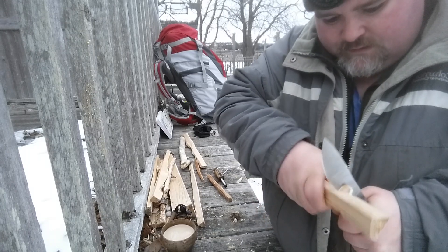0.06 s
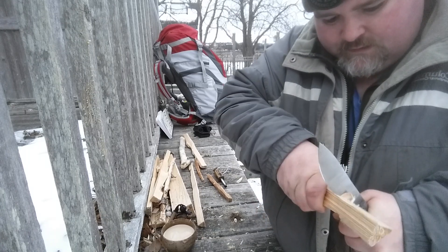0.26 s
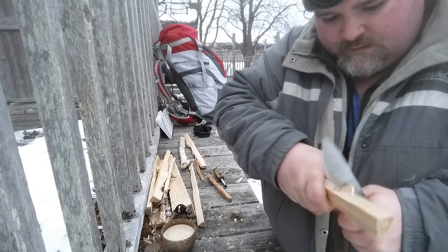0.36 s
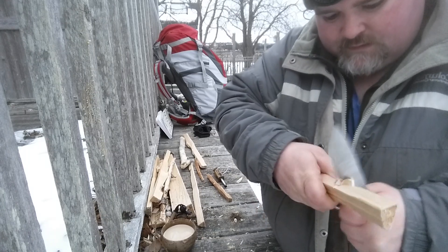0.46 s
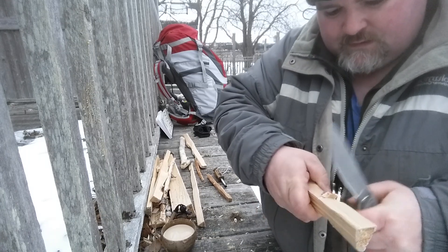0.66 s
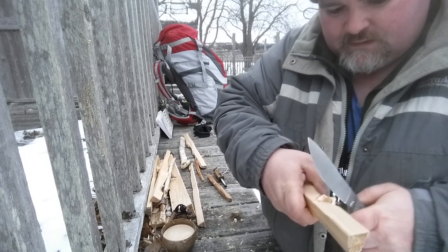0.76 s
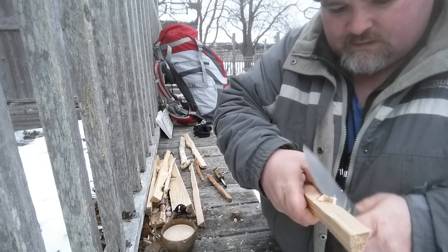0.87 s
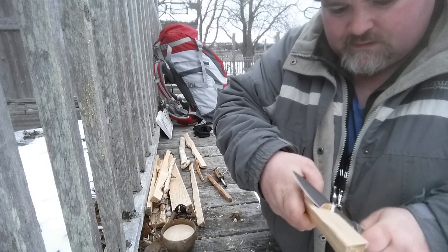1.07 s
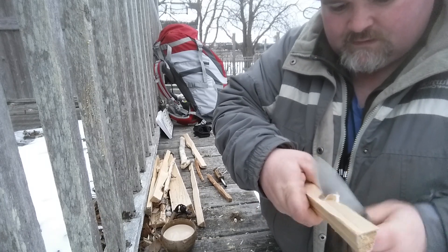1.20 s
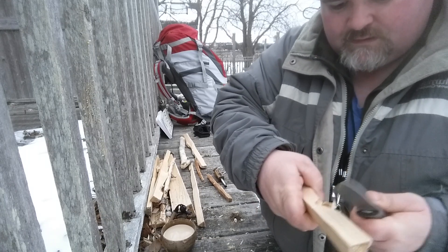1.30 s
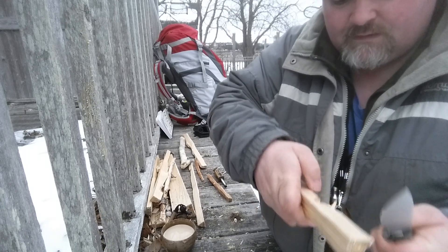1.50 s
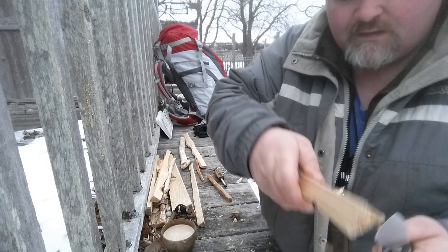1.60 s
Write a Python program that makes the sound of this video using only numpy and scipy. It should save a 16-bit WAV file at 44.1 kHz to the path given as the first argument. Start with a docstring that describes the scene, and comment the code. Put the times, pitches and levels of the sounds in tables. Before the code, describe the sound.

Close, dry whittling in an open yard: quick woody clicks, a hard crack as a chip breaks, then lighter knocks and hissy shaving, with jacket rustle, low distant rumble and a faint steady hum beneath.

```python
"""Outdoors in a yard, a knife cleans a notch in a hand-held stick, close to a small stereo microphone.
The edge bites in short noise bursts and damped stick modes; a chip snaps off and the blade rings.
Then the blade taps, squeaks in narrow bands of noise and shaves with grainy hiss; sleeves rustle.
Filtered noise makes the distant rumble, wash and fading hiss, and two sines a faint hum.
The microphone ports lift the high treble, differently on each side."""
import sys
import numpy as np
from scipy import signal
from scipy.fft import rfft, irfft, next_fast_len
from scipy.io import wavfile
from scipy.ndimage import uniform_filter1d

SR = 44100
rng = np.random.default_rng(int(sys.argv[2]) if len(sys.argv) > 2 else 0)


def generate_wav(sig):
    """Save sig (samples, or channels by samples) to the path in sys.argv[1] as 16-bit PCM at SR."""
    pcm = np.round(np.clip(np.atleast_2d(sig).T, -1, 1) * 32767).astype(np.int16)
    wavfile.write(sys.argv[1], SR, pcm)


N = 72765

# blade meets wood, levels ahead of the microphone:
# start_s, knock_db, knock_centre_hz, knock_width_octaves, crack_db, crack_rise_s
CONTACTS = [(0.1942, -46, 1830, 1.2, -53, 0.0011), (0.218, -53, 600, .8, -58, 0.0019),
            (0.226, -63, 700, 1, -54, 0.00054), (0.2306, -57, 1000, 0.85, -47.5, 0.00073),
            (0.2348, -36.5, 930, 0.35, -67, 0.00077), (0.313, -18, 1920, 2.9, -30, 0.0015),
            (0.6195, -74, 2000, 1, -66, 0.0027), (1.1640, -47, 1010, 1.45, -62, 0.00072),
            (1.4294, -36, 2460, 1.04, -58, .0006)]
YARD_T60_S = 0.23  # the scatter's decay; each knock is also cut off after this time


def undb(db):
    """Decibels to gain."""
    return 10 ** (np.asarray(db) / 20)


def unit(x):
    """Scale to rms 1."""
    return x / np.sqrt(np.mean(x ** 2))


def colour(x, points):
    """Causal minimum-phase filter through (Hz, dB) points, built by folding the cepstrum."""
    size = 2 * next_fast_len(N)
    hz, db = np.array(points, float).T
    bin_hz = np.arange(size // 2 + 1) * SR / size
    log_gain = np.interp(np.log(bin_hz + 1), np.log(hz), np.log(undb(db)))
    cepstrum = irfft(log_gain, size)
    cepstrum[1:size // 2] *= 2
    cepstrum[size // 2 + 1:] = 0
    response = np.exp(rfft(cepstrum))
    return irfft(rfft(x, size) * response, size)[..., :N]


def resonate(x, hz, width_hz):
    """One resonance, gain 1 at its centre."""
    return signal.lfilter(*signal.iirpeak(hz, hz / width_hz, fs=SR), x)


def ring(age, hz, t60):
    """A struck mode, a sine dying by 60 dB in t60 seconds."""
    return np.sin(2 * np.pi * hz * age) * np.exp(-np.log(1000) * age / t60)


def walk(rate):
    """Smooth random drift of rms 1, with about `rate` new values a second."""
    k = int(SR / rate)
    steps = np.repeat(rng.standard_normal(N // k + 2), k)
    smooth = uniform_filter1d(uniform_filter1d(steps, k), k)
    return unit(smooth[:N])


def swell(t, at, rise, fall, db):
    """A bell-shaped push with its own rise and fall."""
    return undb(db) * np.exp(-((t - at) / np.where(t < at, rise, fall)) ** 2)


def friction():
    """Dense tiny slips of uneven size over a smooth hiss, as heard at the two ports."""
    slips_per_s, spread_db, smooth_share = 5000, 3.5, 0.52
    sizes = undb(spread_db * rng.standard_normal(N))
    slips = (rng.random(N) < slips_per_s / SR) * sizes
    grains = unit(slips * rng.standard_normal((2, N)))
    smooth = rng.standard_normal((2, N))
    return np.sqrt(1 - smooth_share) * grains + np.sqrt(smooth_share) * smooth


def outdoors():
    """Distant rumble, alike on both sides in the bass, and a machine hum that wavers slightly."""
    # rumble spectrum: hz, density_db
    rumble_spectrum = [(12, -9.5), (30, 2), (55, -2.5), (90, -3), (160, -6), (300, -10.5), (420, -15.5),
                       (600, -25), (1150, -28.5), (1750, -39.5), (2250, -33), (2650, -41.5), (3100, -39.5),
                       (4500, -58), (9000, -58.5), (16000, -41)]
    rumble_db, alike_below_hz = -51, 606
    hum_hz, hum_db, octave_db, waver_share = 193.4, -54, -17.5, 0.0042
    mid, side = rng.standard_normal((2, N))
    side = signal.sosfilt(signal.butter(1, alike_below_hz, "high", fs=SR, output="sos"), side)
    rumble = unit(colour(mid + side * np.array([[1], [-1]]), rumble_spectrum))
    phase = 2 * np.pi * np.cumsum(hum_hz * (1 + waver_share * walk(8.2))) / SR
    hum = unit(np.sin(phase) + undb(octave_db) * np.sin(2 * phase))
    return undb(rumble_db) * rumble + undb(hum_db) * hum


def distance(t):
    """A far midrange wash of noise swells and ebbs; a hiss through two resonances fades."""
    # wash over time: start_s, level_db
    wash_levels = [(0, -61.5), (.3, -78), (.55, -74.5), (.75, -65), (.95, -66), (1.2, -68.5), (1.65, -83.5)]
    # wash spectrum: hz, density_db
    wash_spectrum = [(300, -42), (700, -1.5), (1000, 2.5), (1250, -0.5), (1700, -17.5), (4000, -32)]
    # hiss over time: start_s, level_db
    hiss_levels = [(0, -61), (.12, -69), (.5, -73.5), (1.65, -84.5)]
    hiss_hz, width_hz = 2240, 310  # width of each resonance
    shared, own = rng.standard_normal(N), rng.standard_normal((2, N))
    wash = unit(colour(shared + own, wash_spectrum))
    hiss = rng.standard_normal((2, N))
    for _ in range(2):
        hiss = resonate(hiss, hiss_hz, width_hz)
    wash_db = np.interp(t, *np.array(wash_levels).T)
    hiss_db = np.interp(t, *np.array(hiss_levels).T)
    return wash * undb(wash_db) + unit(hiss) * undb(hiss_db)


def yard(x, t):
    """A short faint scatter off the fence and the deck, as a decaying noise echo."""
    # colour of the scatter: hz, level_db
    echo_spectrum = [(100, -26), (400, 5), (2200, -1), (5000, -4), (16000, -4.5)]
    scatter_db = -21.5
    tail = colour(rng.standard_normal((2, N)), echo_spectrum) * np.exp(-np.log(1000) * t / YARD_T60_S)
    return undb(scatter_db) * signal.fftconvolve(x, unit(tail) / np.sqrt(N), axes=1)[:, :N]


def sleeves(t, flicker_db=1):
    """Jacket cloth rubs as the arms move: coloured friction with a flickering level."""
    # rustle over time: start_s, level_db
    rustle_levels = [(0, -67), (.064, -66), (.142, -76), (.29, -72.5), (.34, -70), (.41, -70.5),
                     (.6, -68.5), (.8, -68.5), (.922, -76.5), (1.03, -75), (1.08, -72.5), (1.138, -75),
                     (1.3, -69), (1.44, -66.5), (1.49, -70), (1.6, -69.5), (1.65, -71)]
    # cloth spectrum: hz, density_db
    cloth_spectrum = [(500, -10), (3000, 2), (6000, 1.5), (8000, -8), (10000, -1), (16000, 1)]
    level_db = np.interp(t, *np.array(rustle_levels).T)
    return unit(colour(friction(), cloth_spectrum)) * undb(level_db + flicker_db * walk(40.15))


def bumps(t):
    """The stick jolts in the hand, which damps its dull ring."""
    # jolts in the grip: start_s, level_db, pitch_hz, t60_s
    jolts = [(0.2027, -35.5, 330, 0.018), (0.2290, -41.5, 284, 0.11), (0.2347, -35.5, 1080, 0.0099),
             (0.3161, -32.5, 716, 0.017), (1.0478, -39, 368, 0.024), (1.1635, -34, 394, 0.02),
             (1.4335, -50.5, 680, .04)]
    # a ring's age stops at twice its t60, already 120 dB down
    return -sum(undb(db) * ring(np.clip(t - at, 0, 2 * t60), hz, t60) for at, db, hz, t60 in jolts)


def blade(t):
    """A thin brief ring of steel as the chip lets the blade go."""
    start_s, pitch_hz, level_db, t60_s = 0.3145, 1892, -42, .07
    return undb(level_db) * ring(np.maximum(t - start_s, 0), pitch_hz, t60_s)


def squeaks(t):
    """The edge sticks and slips in the notch, exciting two narrow bands."""
    # squeaks of the edge: peak_s, rise_s, fall_s, level_db (upper band), pitch_hz (upper band)
    slides = [(1.047, 0.0023, .004, -67, 12530), (1.107, .014, 0.0088, -63.5, 13530),
              (1.161, 0.0076, .005, -61, 13600)]
    width_hz, low_hz, low_db = 790, 5000, -9.5  # low_db is relative to the upper band
    out = 0
    for at, rise, fall, db, hz in slides:
        slips = friction()
        upper = unit(resonate(slips, hz, width_hz))
        lower = unit(resonate(slips, low_hz, width_hz / 2))
        out = out + (upper + undb(low_db) * lower) * swell(t, at, rise, fall, db)
    return out


def shaving(t):
    """The edge slides through the grain as friction hiss; the first two pushes also creak the stick."""
    # cutting strokes: peak_s, rise_s, fall_s, level_db
    strokes = [(0.204, 0.027, 0.021, -63), (0.237, 0.0086, 0.016, -60), (1.236, 0.047, 0.039, -63.5),
               (1.355, 0.048, 0.045, -54), (1.568, 0.023, .018, -65.5)]
    # shaving spectrum: hz, density_db
    shaving_spectrum = [(100, -21), (400, 9), (1200, 0), (2500, 0.5), (5000, -0.5), (7500, -4), (10000, 2),
                        (16000, 1.5)]
    # creaks under the push: peak_s, rise_s, fall_s, level_db
    creak_pushes = [(0.206, .02, .012, -50), (0.237, .009, .013, -45)]
    # creak spectrum: hz, density_db
    creak_spectrum = [(100, -25), (220, -2.5), (310, -9.5), (500, -6.5), (800, -12.5), (1300, -14.5),
                      (1700, -22.5), (5000, -41)]
    hiss = unit(colour(friction(), shaving_spectrum))
    creak = unit(colour(friction()[0], creak_spectrum))  # the same on both sides
    hiss_push = sum(swell(t, *row) for row in strokes)
    creak_push = sum(swell(t, *row) for row in creak_pushes)
    return hiss * hiss_push + creak * creak_push


def cracks(t):
    """Fibres part in an uneven burst that builds within about three milliseconds and dies fast."""
    fall_s, tail_db, tail_s = 0.0018, -14, 0.0052  # exponential time constants
    splinters_per_s, splinter_db = 3500, 3
    force = np.zeros(N)
    for at, _, _, _, db, rise in CONTACTS:
        after = np.maximum(t - at - rise, 0)
        build = np.sqrt(np.clip((t - at) / rise, 0, 1))
        decay = np.exp(-after / fall_s) + undb(tail_db) * np.exp(-after / tail_s)
        force += undb(db) * build * decay
    splinters = unit(undb(splinter_db * walk(splinters_per_s)))
    return force * splinters * np.sign(rng.standard_normal((2, N)))


def knocks(t):
    """Each contact crushes fibres and rings the stick's modes, strongest near that knock's centre."""
    # modes of the stick, before each knock's weighting: pitch_hz, level_db
    stick_modes = [(380, -8.5), (690, -5), (1330, -12), (1780, -13), (2130, -1.5), (2480, -4.5),
                   (3000, -13), (3700, -12), (4750, -11), (6850, -3.5), (8290, -9.5)]
    # crushed fibres: hz, density_db
    crunch_spectrum = [(200, -26), (700, -9), (1000, -25), (1400, -5), (2300, 2.5), (3200, -8.5),
                       (4200, -9.5), (9000, -24)]
    crunch_db, crunch_t60_s = -12.5, 0.022  # relative to the knock
    stick_t60_s, t60_slope = 0.024, 0.17  # at 1 kHz; octaves shorter per octave of pitch
    left_lag_s = .00009
    out = np.zeros((2, N))
    crunch = unit(colour(rng.standard_normal((2, N)), crunch_spectrum))
    for at, db, centre_hz, width, _, _ in CONTACTS:
        span = (t > at) & (t < at + YARD_T60_S)
        age = np.maximum(t[span] - at - np.array([[left_lag_s], [0]]), 0)
        crunch_decay = np.exp(-np.log(1000) * age / crunch_t60_s)
        out[:, span] += undb(db + crunch_db) * crunch[:, span] * crunch_decay
        for hz, mode_db in stick_modes:
            t60 = stick_t60_s * (hz / 1000) ** -t60_slope
            weight = undb(db + mode_db) * np.exp(-(np.log2(hz / centre_hz) / width) ** 2)
            out[:, span] -= weight / 2 * ring(age, hz, t60)
    return out


def scene():
    """Knife work in the yard over cloth and distant sounds."""
    t = np.arange(N) / SR
    background = outdoors() + distance(t)
    knife = bumps(t) + blade(t) + squeaks(t) + shaving(t) + cracks(t) + knocks(t)
    return background + sleeves(t) + yard(knife, t) + knife


def record(dry):
    """Each microphone port lifts the high treble in its own way; the top is cut."""
    # response of the left port: hz, gain_db
    left_port = [(150, -1.5), (600, 1.5), (1800, -1), (4500, -0.5), (7000, -5), (8200, 9.5), (9100, 19),
                 (9950, 29), (10900, 22.5), (12400, 22), (14000, 12), (16000, 11)]
    # response of the right port: hz, gain_db
    right_port = [(150, 1.5), (600, 0.5), (1800, 0.5), (4500, 2), (7000, 1), (8400, 0.5), (10000, 11.5),
                  (11200, 21.5), (12200, 25.5), (13200, 11.5), (14300, 17.5), (16000, -27)]
    top_hz = 15850
    heard = np.array([colour(dry[0], left_port), colour(dry[1], right_port)])
    return signal.sosfilt(signal.ellip(10, .2, 80, top_hz, fs=SR, output="sos"), heard)


dry = scene()
out = record(dry)
generate_wav(out)
```